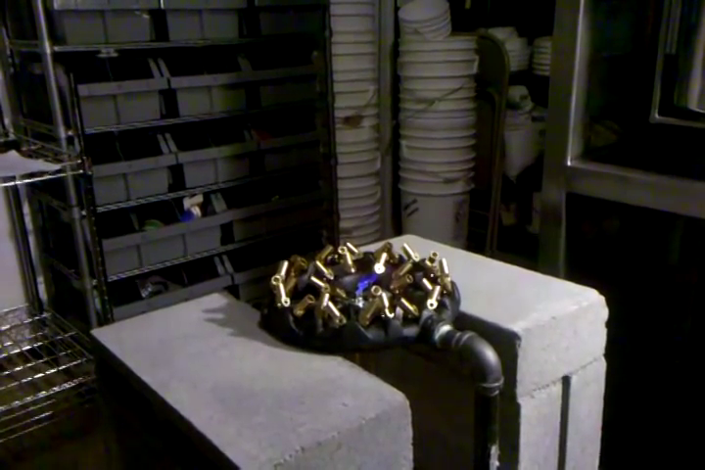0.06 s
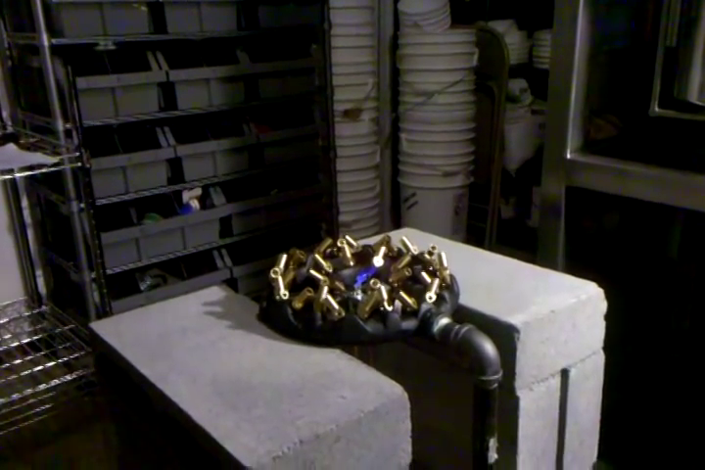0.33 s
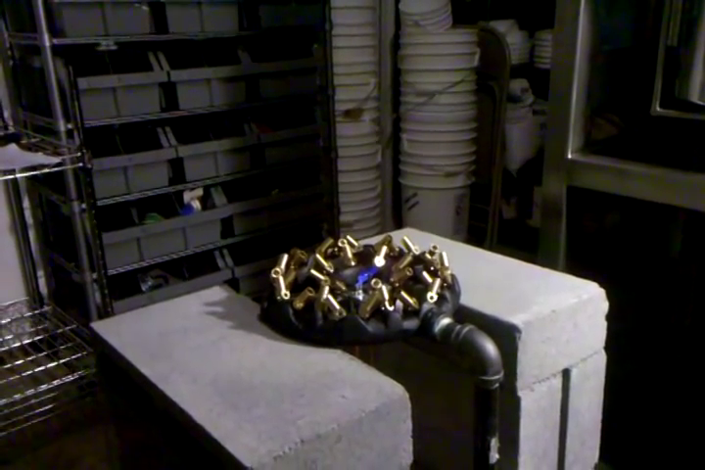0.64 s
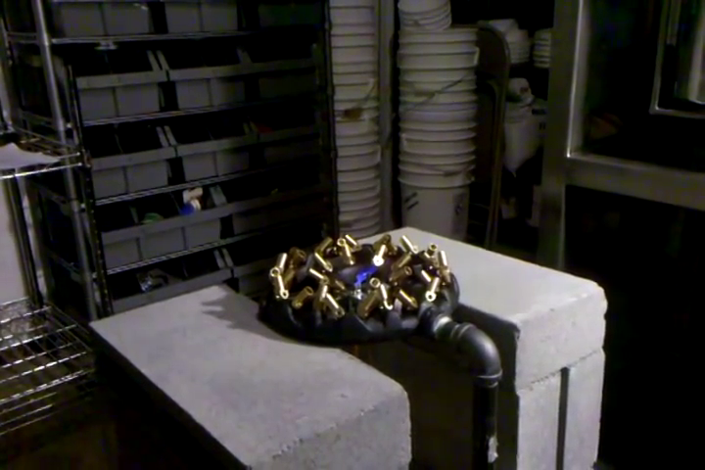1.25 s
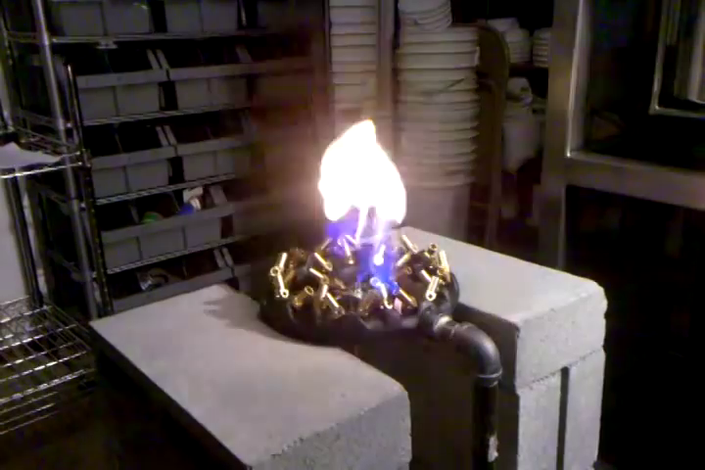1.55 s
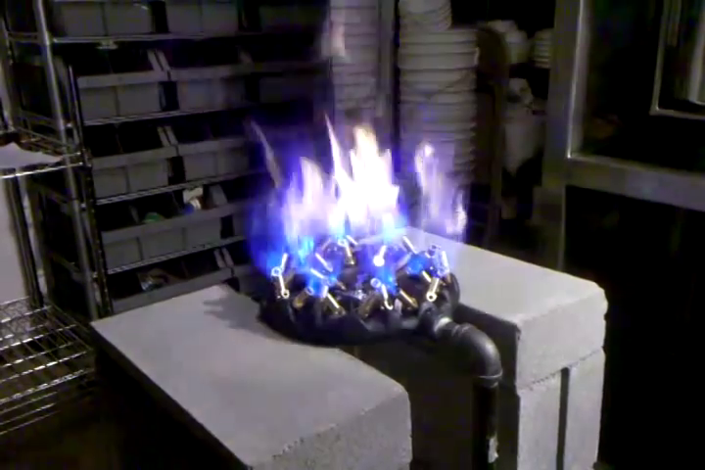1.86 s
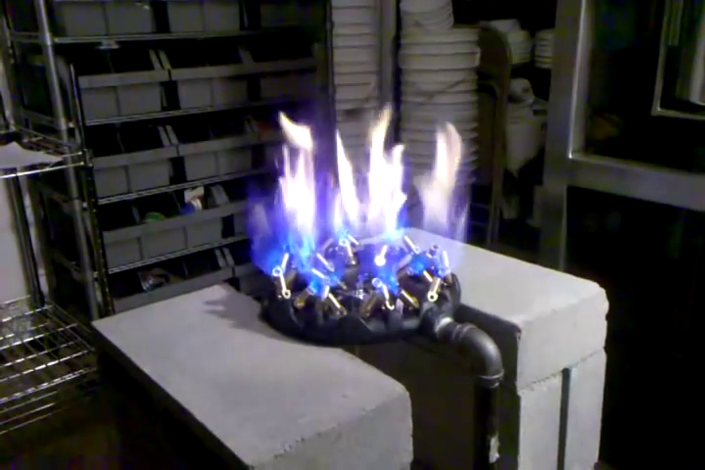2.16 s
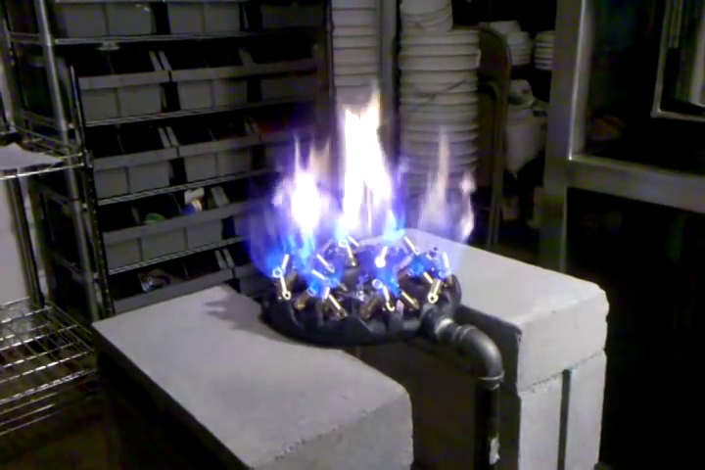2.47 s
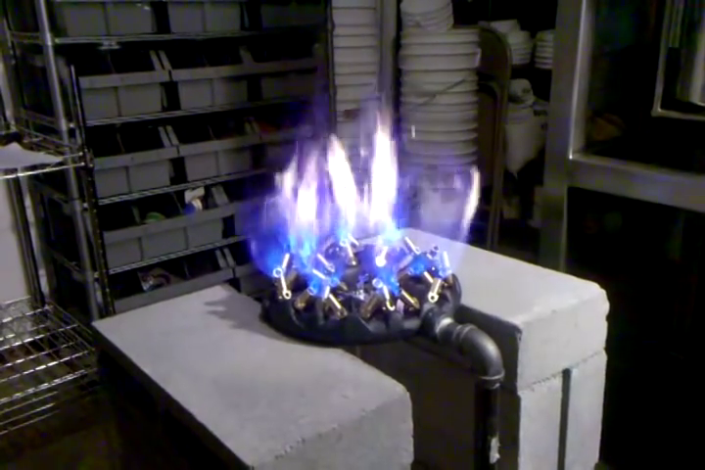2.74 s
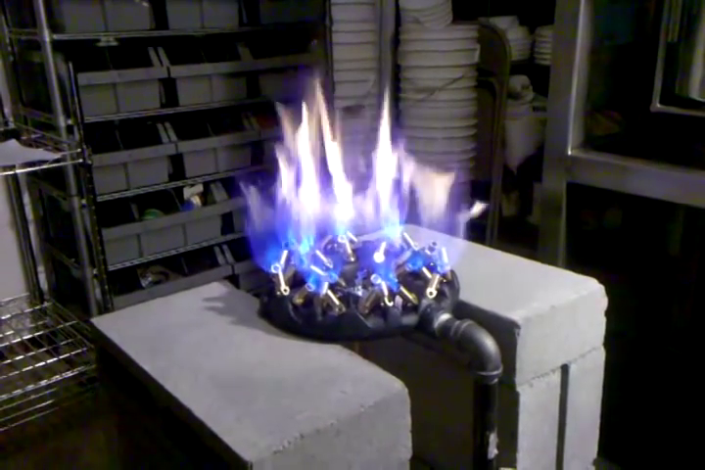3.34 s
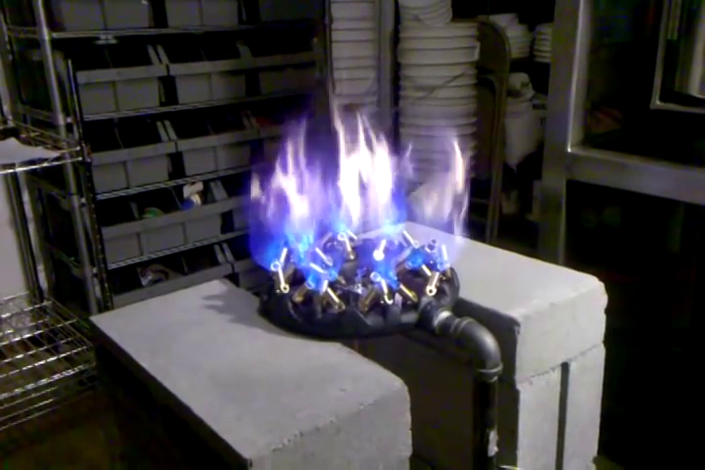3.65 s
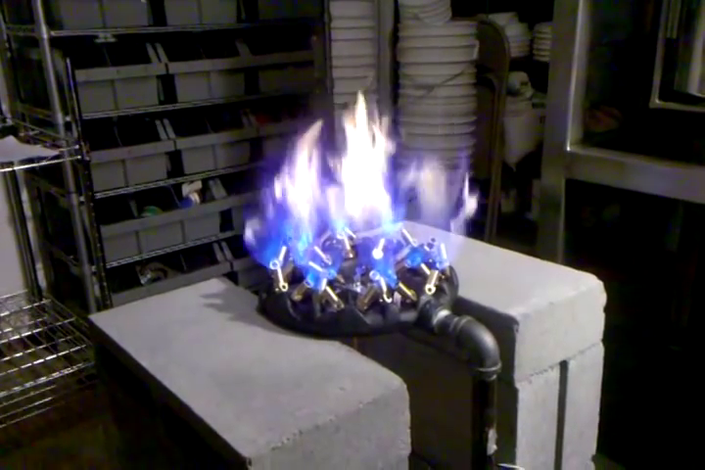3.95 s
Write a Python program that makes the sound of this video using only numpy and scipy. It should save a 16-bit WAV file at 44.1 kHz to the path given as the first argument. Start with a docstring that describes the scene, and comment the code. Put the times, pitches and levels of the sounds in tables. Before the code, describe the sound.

A valve clacks, then a propane burner catches with a whump and keeps roaring indoors.

```python
"""Ventilation hums and a pilot flame hisses faintly in a workshop. A solenoid valve clacks open and gas
flows to a multi-jet propane burner. A small puff catches at the pilot, the whole ring lights with a
whump, and the flame settles to a steady roar that stirs the room's standing waves. One narrow-band
microphone stands near enough to hear more of the flame's direct sizzle than of its reverberation."""
import sys
import numpy as np
from scipy import signal
from scipy.fft import rfft, irfft, next_fast_len
from scipy.io import wavfile
from scipy.ndimage import map_coordinates

SR = 44100
rng = np.random.default_rng(int(sys.argv[2]) if len(sys.argv) > 2 else 0)


def log_audio(samples):
    """Write samples as a 16-bit WAV file to the path given in sys.argv[1]."""
    # one column per channel
    frames = np.atleast_2d(samples).T
    # limit to full scale, then quantise
    limited = np.clip(frames, -1, 1)
    pcm = np.round(limited * 32767).astype(np.int16)
    wavfile.write(sys.argv[1], SR, pcm)


N = 176400


def flame():
    """One flame strength drives a turbulent low roar and a finer sizzle; the room colours both."""
    # Strength of the flame. Each row: time in seconds, level in dB.
    strength = [(1.5, -80), (1.52, -49), (1.56, -52.5), (1.61, -56), (1.645, -48), (1.664, -36.5),
                (1.698, -37), (1.707, -31.5), (1.745, -32.3), (1.785, -36.5), (1.83, -34.3), (1.87, -36),
                (1.912, -33.2), (1.99, -36.3), (2.2, -38.5), (2.5, -38.1), (3.4, -38.3), (4.0, -37.8)]
    # Turbulent roar and sizzling flame fronts. Each row: frequency in Hz, relative level in dB.
    roar_spectrum = [(25, -49.5), (48, -46.5), (70, -19), (115, -9.5), (200, -1), (310, -1.5), (440, -6),
                     (570, -5), (720, -10), (900, -11.5), (1050, -13.5), (1260, -10.5), (1600, -17.5),
                     (1900, -18.5), (2700, -31.5), (5000, -47)]
    sizzle_spectrum = [(300, -25), (1500, 5), (2300, 4.5), (2700, -2), (3400, 1.5), (4100, -0.5),
                       (5000, -4), (5800, -5), (6400, -10), (6900, -11.5), (8000, -19)]
    flutter_db, surge_db, sizzle_offset_db = 0.86, 0.69, -15.7
    diffuse_hz, wet_db = 870, -10  # above this pitch the room's modes merge into a diffuse tail
    level_db = np.interp(np.arange(N) / SR, *np.transpose(strength))
    eddies_db = flutter_db * wobble(rate=45) + surge_db * wobble(rate=10)
    turbulence = noise(roar_spectrum) * amp(eddies_db)
    roar = unit(coloured(turbulence, standing_waves)) * amp(level_db)
    sizzle_db = level_db + sizzle_offset_db + 0.44 * eddies_db + 0.67 * wobble(rate=250)
    fire = roar + noise(sizzle_spectrum) * amp(sizzle_db)
    upper = signal.sosfiltfilt(signal.butter(2, diffuse_hz, 'high', fs=SR, output='sos'), fire)
    upper_in_room = in_room(upper, wet_db)[:N] / np.hypot(1, amp(wet_db))  # power stays the same
    return fire - upper + upper_in_room


def ignition():
    """Each pocket of gas catches and swells in one pressure pulse that booms in the room."""
    # Pockets of gas. Each row: start in seconds, relative level in dB, length of the push in seconds.
    pockets = [(1.513, -36, .0015), (1.523, -36, .002), (1.629, -38, .0018), (1.651, -31, .0018),
               (1.704, -14.5, .0015), (1.732, -23, .0012), (1.767, -27, .0014)]
    # Colour of the whump. Each row: frequency in Hz, gain in dB.
    whump_colour = [(30, -27.5), (55, -26), (80, -0.5), (150, 5.5), (280, 10), (500, -3.5), (1500, -15.5),
                    (6000, -33)]
    out, t = np.zeros(N), np.arange(SR // 10) / SR
    onset = 1 - np.exp(-t / 0.00029)
    for start, db, length in pockets:
        pulse = (1 - t / length) * np.exp(-t / length) * onset  # a push, then a shallow suction
        add(out, start, amp(db) * in_room(pulse, wet_db=-6))
    return coloured(out, lambda hz: along(whump_colour, hz) + standing_waves(hz))


def flash():
    """The flame front tears round the ring in one short midrange burst."""
    # The racing flame front. Each row: frequency in Hz, relative level in dB.
    front_spectrum = [(150, -18), (400, -3), (560, 0), (800, 3), (1250, -7), (1700, -23), (2700, -36),
                      (3600, -20), (7000, -38)]
    start_s, level_db, rise_s, t60_s = 1.658, -29.5, 0.004, 0.14
    t = np.maximum(np.arange(N) / SR - start_s, 0)
    envelope = amp(level_db - 60 * t / t60_s) * (1 - np.exp(-t / rise_s))
    return envelope * noise(front_spectrum)


def valve():
    """The plunger ticks, slams home and rebounds; the pipe rings and the room answers."""
    # Plunger contacts. Each row: start in seconds, relative strength in dB, low-pass corner in Hz.
    contacts = [(1.008, -19, 6000), (1.0135, -8, 1200), (1.0215, 1, 12000), (1.0245, -2, 3500),
                (1.034, -9, 3000)]
    # Colour of the plunger's impact. Each row: frequency in Hz, gain in dB.
    clack_colour = [(50, -20), (130, -1), (270, 1), (480, -9), (650, -5), (850, -8), (1250, 1), (1800, -5),
                    (2500, -6), (2950, -1.5), (3500, -4.5), (4100, -3.5), (4800, -6), (5500, -2.5),
                    (6200, -7), (7000, -4), (8000, -4)]
    # Modes of valve body and pipe. Each row: frequency in Hz, relative level in dB, t60 in seconds.
    modes = [(193, -1, .35), (218.6, -3, 0.45), (285, 3.5, 0.53), (345, 0, 0.88), (624, -3, 0.12),
             (705, -6, 0.24), (1294, 5, 0.14), (1293, 2, 0.37), (1684, 3, .24), (2085, 6, 0.28),
             (2170, -5, 0.33), (2784, 5.5, 0.28), (4218, -5, 0.33), (5450, -6, 0.31), (6772, -22, 0.16)]
    clack_gain_db, crack_t60_s = -7.5, 0.009
    ring_gain_db, ring_rise_s = -45.5, 0.011
    out, t = np.zeros(N), np.arange(SR // 2) / SR
    for start, db, corner_hz in contacts:
        crack = rng.standard_normal(len(t)) * amp(-60 * t / crack_t60_s)
        crack = signal.lfilter(*signal.butter(1, corner_hz, fs=SR), crack / np.linalg.norm(crack))
        add(out, start, amp(clack_gain_db + db) * in_room(crack, wet_db=4))
    out = coloured(out, lambda hz: along(clack_colour, hz))
    ring = np.zeros(len(t))
    for hz, db, t60 in modes:
        waver_rad = wobble(rate=min(hz / 10, 120))[:len(t)]
        ring += amp(db - 60 * t / t60) * np.sin(2 * np.pi * hz * t + waver_rad)
    slam_s = max(contacts, key=lambda row: row[1])[0]  # the hardest contact starts the ringing
    add(out, slam_s, amp(ring_gain_db) * ring * (1 - np.exp(-t / ring_rise_s)))
    return out


def gas():
    """Gas reaches the nozzles a moment after the valve opens and hisses out."""
    # Gas at the nozzles. Each row: frequency in Hz, relative level in dB.
    jet_spectrum = [(500, -22), (2500, 6), (3500, -5.5), (5200, 6.5), (6800, -1), (8000, -15)]
    level_db, start_s, rise_s = -69.5, 1.44, 0.14
    flow = np.clip((np.arange(N) / SR - start_s) / rise_s, 0, 1)
    return amp(level_db) * flow * noise(jet_spectrum)


def ventilation_and_pilot():
    """The workshop's room tone: ventilation rush, pilot hiss and a slightly unsteady motor hum."""
    # Ventilation and pilot flame. Each row: frequency in Hz, relative level in dB.
    air_spectrum = [(25, -40), (50, -28.5), (85, -14.5), (105, -5), (210, -0.5), (280, -1.5), (400, -0.5),
                    (650, -5.5), (1000, -6.5), (1350, -7), (1650, -11), (2100, -13.5), (2600, -18),
                    (3100, -20.5), (3700, -17), (4400, -18), (4930, -17), (5150, -23.5), (6800, -27.5),
                    (8000, -28.5)]
    # Tones of the motor. Each row: frequency in Hz, rms level in dB.
    motor_tones = [(243.4, -68), (469.6, -65), (528.4, -75), (560.7, -69), (680.5, -75), (1965, -78)]
    t = np.arange(N) / SR
    air = amp(-57 + 1.2 * wobble(rate=8)) * noise(air_spectrum)
    hum = np.zeros(N)
    for hz, db in motor_tones:
        peak = np.sqrt(2) * amp(db + 0.61 * wobble(rate=4))
        hum += peak * np.sin(2 * np.pi * hz * t + 0.2 * wobble(rate=5))
    return air + hum


def standing_waves(hz):
    """Gain in dB of the room's resonances and cancellations where the microphone stands."""
    # Room resonances. Each row: centre in Hz, width in Hz, lift in dB.
    resonances = [(78, 12, 8), (158, 9, 9), (224, 12, 7), (257, 9, 5), (288, 8, 7), (340, 12, 8),
                  (385, 12, 6), (420, 9, 8), (498, 12, 3), (559, 10, 4), (579, 14, 4), (657, 16, 5),
                  (772, 10, 8), (894, 14, 4), (954, 10, 7)]
    # Cancellations between the walls. Each row: centre in Hz, width in Hz, cut in dB.
    nulls = [(93, 12, 9), (245, 10, 5), (274, 10, 4), (368, 14, 8), (402, 14, 9), (445, 18, 5),
             (796, 12, 7), (980, 22, 5), (1660, 60, 4)]

    def bells(rows):
        return sum(db / (1 + (2 * (hz - centre) / width) ** 2) for centre, width, db in rows)
    return bells(resonances) - bells(nulls)


def in_room(x, wet_db):
    """The direct sound followed by the workshop's diffuse tail, the treble dying sooner."""
    # Reverberation of the workshop. Each row: frequency in Hz, t60 in seconds.
    decay_times = [(100, .6), (400, .6), (1200, .42), (3000, .42), (7500, .39)]
    wall_delay_s = 0.0039
    hz, t, spectra = signal.stft(rng.standard_normal(SR), SR, nperseg=256)
    tail = signal.istft(spectra * amp(-60 * t / along(decay_times, hz)[:, None]), SR)[1]
    tail *= 1 - np.exp(-(np.arange(len(tail)) / SR / wall_delay_s) ** 2)  # reflections build up
    response = amp(wet_db) * tail / np.linalg.norm(tail)
    response[0] += 1  # direct path
    return signal.fftconvolve(x, response)


def amp(db):
    """Decibels to gain."""
    return 10 ** (np.asarray(db) / 20)


def unit(x):
    """Scale to rms 1."""
    return x / np.sqrt(np.mean(x ** 2) + 1e-20)


def along(points, hz):
    """Interpolate (Hz, value) points on a log frequency axis."""
    freqs, values = np.transpose(points)
    return np.interp(np.log(hz + 1), np.log(freqs + 1), values)


def wobble(rate):
    """A smooth random curve with rate knots a second."""
    knots = rng.standard_normal(int(N * rate / SR) + 4)
    return map_coordinates(knots, [np.arange(N) * rate / SR])


def coloured(x, gain_db):
    """x through a causal filter whose gain in dB is a function of frequency."""
    size = 2 * next_fast_len(N)
    cepstrum = irfft(np.log(amp(gain_db(np.fft.rfftfreq(size, 1 / SR)))), size)
    cepstrum[1:size // 2] *= 2  # fold onto positive time for minimum phase
    cepstrum[size // 2 + 1:] = 0
    return irfft(rfft(x, size) * np.exp(rfft(cepstrum)), size)[:N]


def noise(spectrum):
    """Noise of rms 1 shaped by (Hz, dB) points."""
    return unit(coloured(rng.standard_normal(N), lambda hz: along(spectrum, hz)))


def add(track, start_s, sound):
    """Mix a sound into the track at start_s seconds."""
    part = track[round(start_s * SR):][:len(sound)]
    part += sound[:len(part)]


def scene():
    """Everything as it reaches the microphone, in mono."""
    return (ventilation_and_pilot() + valve() + gas() + ignition() + flash() + flame())[None]


def record(dry):
    """The microphone rolls off the treble and keeps nothing above its band limit."""
    # Treble roll-off of the microphone. Each row: frequency in Hz, gain in dB.
    roll_off = [(6900, 0), (7300, -11), (7700, -19.5), (8200, -34.5)]
    band_limit_hz = 8220
    size = next_fast_len(N + SR // 2)
    hz = np.fft.rfftfreq(size, 1 / SR)
    response = amp(along(roll_off, hz)) * (hz < band_limit_hz)
    return irfft(rfft(dry, size) * response, size)[:, :N]


dry = scene()
out = record(dry)
log_audio(out)
```